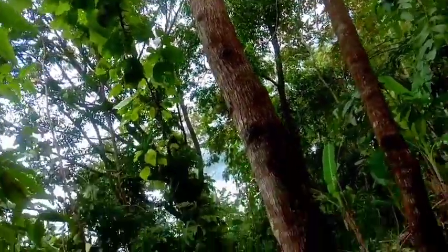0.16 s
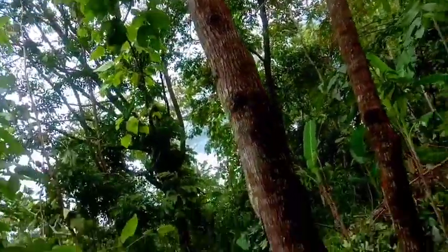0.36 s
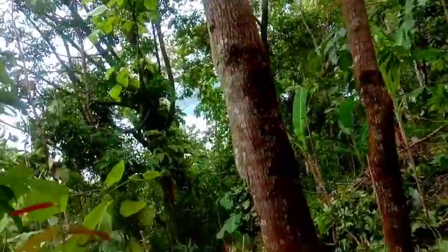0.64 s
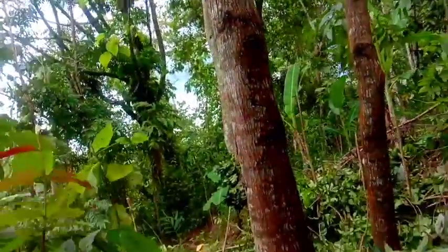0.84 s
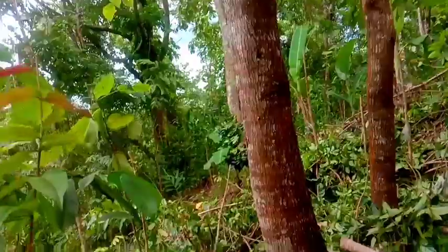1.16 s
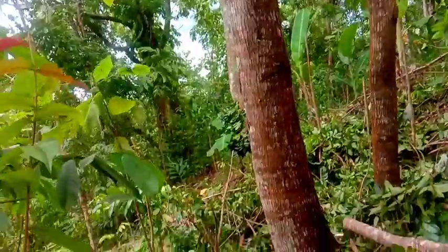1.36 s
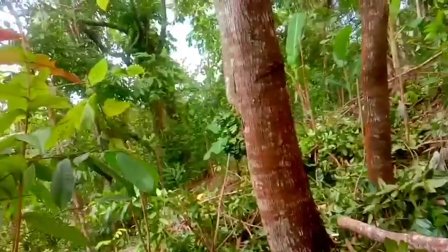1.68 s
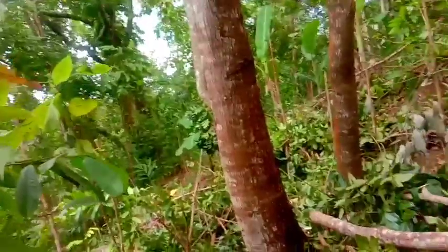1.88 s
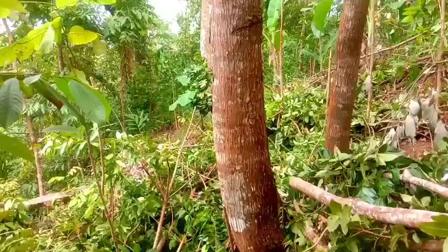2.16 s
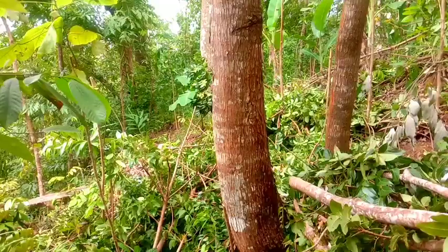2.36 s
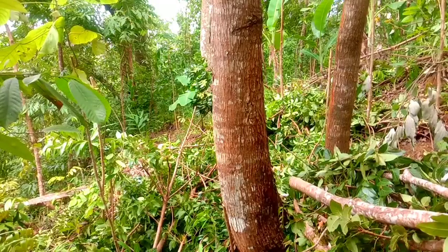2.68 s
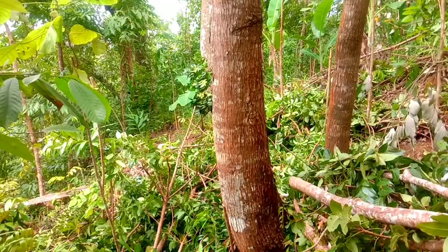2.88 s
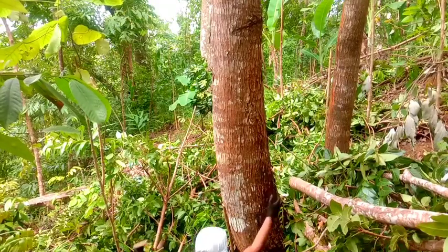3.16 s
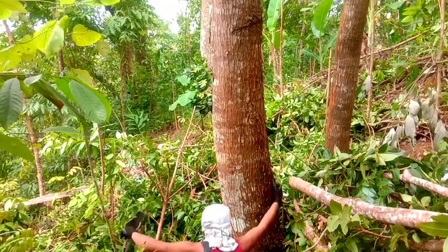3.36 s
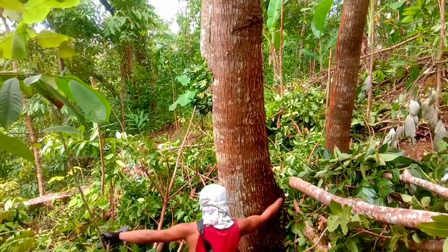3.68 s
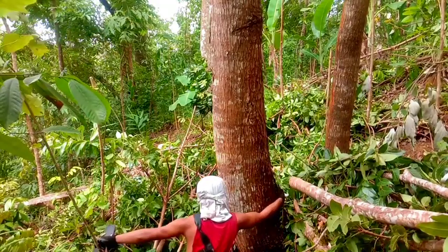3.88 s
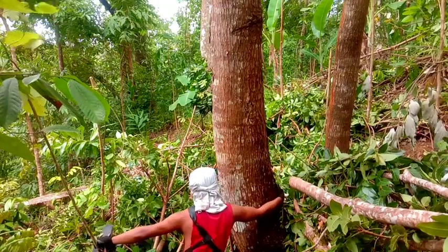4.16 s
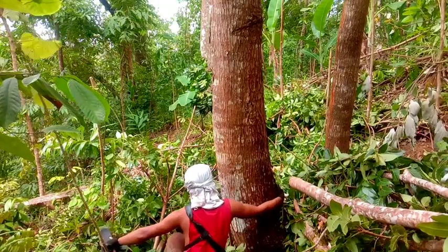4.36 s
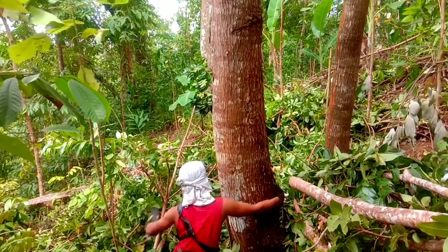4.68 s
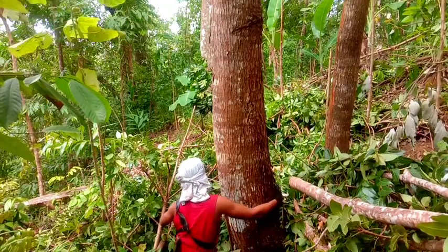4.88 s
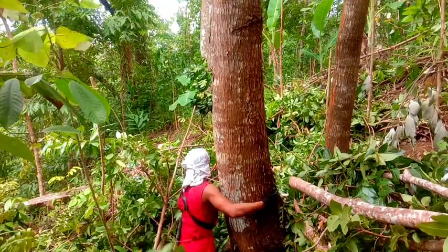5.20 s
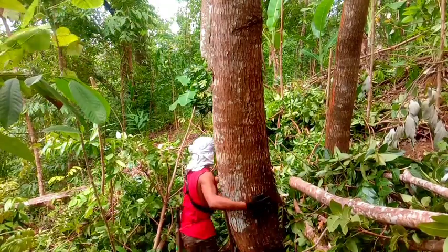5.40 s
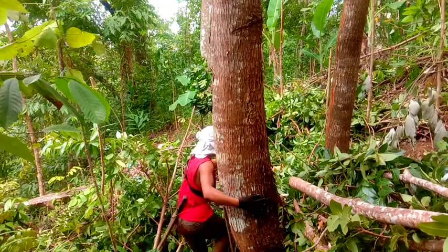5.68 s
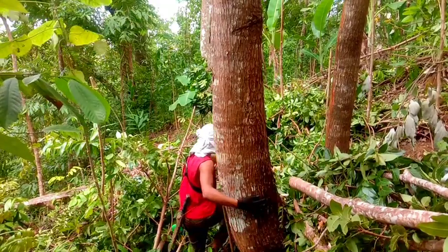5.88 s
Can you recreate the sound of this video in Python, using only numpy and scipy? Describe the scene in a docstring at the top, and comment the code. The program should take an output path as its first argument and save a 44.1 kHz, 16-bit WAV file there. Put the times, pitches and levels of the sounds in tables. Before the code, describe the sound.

For the first 2.3 seconds the forest is very quiet: a low soft murmur, faint hiss, slight leaf stirring and small dry ticks. At about 0.45-0.55 s a hand rubs the camera body, a short low fluttering shudder. A light woody knock comes at 0.76 s with little snaps until 1.1 s, then near calm. From 2.4 s heavy treads push through cut leafy brush in irregular close pulses, crunching and crackling, with soft ground thuds, stick knocks and twig snaps around 2.75, 3.1 and 3.3 s. A hard woody crack at 4.33 s begins the loudest stretch; bright sharp snaps follow at 4.85, 4.93 and 5.11 s, the last strongest. Crunching eases after 5.5 s, almost falling quiet, until a final hard crack and stick knock at 5.97 s. Close, dry, nearly mono, midrange-bright with a slightly boxy small-microphone colour.

```python
"""A foot stirs cut brush in a forest, close to a small camera: faint snaps and knocks over a low murmur.
Near 0.5 s a hand rubs the camera body: a train of slip pulses shakes two low resonances.
From about 2.4 s the treads grow heavy: noise in patches, crackle and ringing flecks make the leaves crush,
noise bursts snap as twigs with short tails, and decaying sines with drifting phase knock as sticks.
The loudest snaps come after 4.3 s; one tone colour shapes leaves and snaps, and a faint hiss adds width."""
import sys
import numpy as np
from scipy import signal
from scipy.fft import rfft, irfft, next_fast_len
from scipy.io import wavfile
from scipy.ndimage import uniform_filter1d, map_coordinates

SR = 44100
rng = np.random.default_rng(int(sys.argv[2]) if len(sys.argv) > 2 else 0)


def store_wav(level_fs):
    """Save 16-bit WAV to argv[1]."""
    pcm = np.round(np.clip(np.atleast_2d(level_fs), -1, 1) * 32767)
    wavfile.write(sys.argv[1], SR, pcm.T.astype(np.int16))


N = 266408


def amp(db):
    """Gain of a level in dB."""
    return 10 ** (np.asarray(db) / 20)


def unit(x):
    """x at rms 1."""
    return x / np.sqrt(np.mean(x ** 2) + 1e-20)


def along(points, hz):
    """Value at hz between (f/Hz, value) points, on a log frequency axis."""
    f, v = np.transpose(points)
    return np.interp(np.log(hz + 1), np.log(f + 1), v)


def curves(rows):
    """One value per sample for each column after the time."""
    s, *cols = np.transpose(rows)
    return [np.interp(np.arange(N) / SR, s, c) for c in cols]


def wobble(rate):
    """A smooth random curve with rate knots a second."""
    knots = rng.standard_normal(int(N * rate / SR) + 4)
    return map_coordinates(knots, [np.arange(N) * rate / SR])


def filtered(x, response):
    """x with its spectrum multiplied by a response of frequency."""
    m = next_fast_len(x.shape[-1] + 8192)
    spectrum = rfft(x, m) * response(np.fft.rfftfreq(m, 1 / SR))
    return irfft(spectrum, m)[..., :x.shape[-1]]


def resonance(f, centre, width):
    """A bandpass resonance with gain 1 at its centre; all arguments in Hz."""
    return 1j * f * width / (centre * centre - f * f + 1j * f * width + 1e-9)


def tone_db(hz):
    """Overall tone colour in dB: a broad curve falling steeply above 15.6 kHz, narrow peaks and a dip."""
    # broad colour: f/Hz, level/dB
    broad = [(40, -56), (150, -10.5), (370, -5), (1000, -5.5), (1700, -4.5), (4000, -4), (6000, -1.5),
             (7400, -4.5), (8700, -15), (12700, -26), (14200, -26.5), (15000, -9.5), (15550, -15.5),
             (15680, -37), (16700, -55.5)]
    # peaks and dip of the microphone's cavity: centre f/Hz, width/Hz, level/dB
    cavity = [(1246, 112, 10.5), (6640, 160, -14.5), (6930, 1600, 5)]
    return along(broad, hz) + sum(db / (1 + (2 * (hz - c) / w) ** 2) for c, w, db in cavity)


def coloured(x):
    """x with the tone colour as minimum phase: it rings after each sound, never before."""
    size = 8192
    response = amp(tone_db(np.fft.rfftfreq(size, 1 / SR)))
    cepstrum = irfft(np.log(response + 1e-4))
    # folding the cepstrum onto positive time gives minimum phase
    cepstrum[1:size // 2] *= 2
    cepstrum[size // 2 + 1:] = 0
    impulse = irfft(np.exp(rfft(cepstrum)))
    return signal.fftconvolve(x, impulse)[:N]


def thirds(x):
    """Low, middle and bright part of x, scaled so that coloured white noise has 0 dB in each band."""
    bands_hz = (200, 900), (1500, 8000), (9000, 14000)
    low = lambda hz: 1 / (1 + (hz / 1000) ** 4)
    high = lambda hz: 1 / (1 + (8300 / (hz + 1)) ** 12)
    middle = lambda hz: 1 - low(hz) - high(hz)
    powers = [np.sum(amp(2 * tone_db(np.arange(*band)))) * 2 / SR for band in bands_hz]
    return [filtered(x, share) / np.sqrt(power) for share, power in zip((low, middle, high), powers)]


def treads():
    """Gain of stems, crush, crisp edge and thud: each tread swells, holds and settles over the forest at rest."""
    # forest at rest: level/dB of stems, leaves, crisp edge, low murmur
    still_db = [-76.5, -69.5, -87.5, -77]
    # pushes of a foot: start t/s, hold/s, crush level/dB, thick stems/dB re crush,
    # dry crisp edge/dB re crush, ground thud level/dB
    pushes = [(0.1, 0.36, -72, -13, -24, -84), (0.852, 0.17, -71, -6, -27, -81),
              (1.425, 0.05, -71, -7, -19, -81), (1.897, 0.29, -69, -14, -25, -78),
              (2.365, 0.048, -53, -10.5, -20, -72), (2.494, 0.064, -54, -6, -20, -82),
              (2.63, 0.13, -44.5, -9.5, -21, -72), (2.867, 0.12, -50, -9.5, -19.5, -77),
              (3.11, 0.11, -53.5, -10.5, -22.5, -77), (3.274, 0.13, -48.5, -9, -22.5, -71.5),
              (3.502, 0.11, -49, -12.5, -20, -73), (3.703, 0.071, -50.5, -14.5, -19, -85),
              (3.818, .05, -57, -13, -17, -79), (3.923, 0.18, -48, -14, -19, -71),
              (4.153, .05, -55.5, -13, -19, -74), (4.273, 0.19, -48, -13, -20, -70.5),
              (4.575, 0.086, -47, -15, -15, -72), (4.72, 0.031, -43, -15, -19.5, -71),
              (4.86, .04, -57, -4, -24, -70), (4.927, 0.024, -43, -10.5, -19, -63.5),
              (5.173, 0.11, -50, -15.5, -17.5, -94), (5.302, 0.15, -48.5, -14.5, -20.5, -80),
              (5.55, 0.026, -60, -9.5, -19, -76), (5.726, 0.048, -53.5, -14.5, -22.5, -76),
              (5.954, 0.037, -68, -6.5, -12, -86)]
    rise_db_per_s, fall_db_per_s = 216, 86
    t = np.arange(N) / SR
    power = amp(still_db)[:, None] ** 2
    for s, hold, db, stems_db, crisp_db, thud_db in pushes:
        before, after = np.maximum(s - t, 0), np.maximum(t - s - hold, 0)
        shape_db = -rise_db_per_s * before - fall_db_per_s * after
        levels = amp([db + stems_db, db, db + crisp_db, thud_db])
        power = power + np.outer(levels, amp(shape_db)) ** 2
    return np.sqrt(power)


def side_hiss():
    """A faint wavering noise hiss, for opposite polarity in the two channels."""
    # hiss spectrum: f/Hz, relative density/dB per Hz
    spectrum = [(18, -41.5), (30, -20), (137, 0), (1030, -6), (1230, -1), (1830, -16), (5770, -21.5),
                (7120, -41), (15600, -17.5)]
    hiss = unit(filtered(rng.standard_normal(N), lambda hz: amp(along(spectrum, hz))))
    return amp(-83.5 + 6.3 * wobble(12)) * hiss


def air():
    """Footfalls and air: low-passed noise murmurs and swells with each tread."""
    # murmur spectrum: f/Hz, relative density/dB per Hz
    spectrum = [(15, -37), (40, -22.5), (70, -8), (140, -2.5), (250, -8.5), (500, -47)]
    murmur = unit(filtered(rng.standard_normal(N), lambda hz: amp(along(spectrum, hz))))
    thud_gain = treads()[-1]
    return thud_gain * amp(0.64 * wobble(9.2)) * murmur


def rub():
    """Skin slips on the camera housing at an uneven quick rate and shakes its low resonances."""
    # stroke of the hand: t/s, gain/dB
    stroke = [(.428, -99), (.441, -50.5), (.471, -50), (.5, -50.5), (.51, -66), (.521, -51), (.545, -74),
              (.58, -83.5)]
    # camera body resonances: f/Hz, width/Hz, level/dB
    body = [(136, 20, 6.5), (249, 26, -0.5)]
    level_db, = curves([(.4, -120)] + list(stroke) + [(.62, -120)])
    slips_per_s = 135 * (1 + .13 * wobble(60))
    pulses = np.diff(np.floor(np.cumsum(slips_per_s) / SR), prepend=0)
    slips = pulses * amp(3 * wobble(90))
    ring = lambda f: sum(amp(db) * resonance(f, c, w) for c, w, db in body)
    steep = lambda f: ring(f) * (f > 60) / (1 + (f / 400) ** 8)
    return amp(level_db) * unit(filtered(slips, steep))


def knocks():
    """A trodden stick rings briefly on one note, roughened where it scuffs; each ring is high-passed just below
    its note."""
    # ringing sticks and stems: t/s, level before onset and filter/dB, f/Hz, t60/s
    sticks = [(.216, -54.5, 2523, 0.13), (.221, -58.5, 5260, 0.15), (0.512, -49, 234, 0.044),
              (0.76, -39, 1266, 0.034), (.9, -62.5, 1150, 0.66), (1.013, -47, 1266, 0.035),
              (1.247, -55.5, 563, .1), (1.324, -57.5, 1750, .13), (1.349, -53, 1250, 0.097),
              (1.44, -60.5, 800, .13), (1.87, -55, 610, 0.063), (1.89, -56.5, 955, 0.09),
              (2.045, -56, 1755, .075), (2.109, -62.5, 1546, 0.21), (2.174, -51.5, 341, 0.098),
              (2.177, -46, 1310, 0.048), (2.181, -52, 131.8, 0.2), (2.421, -32.5, 542, 0.04),
              (3.082, -35, 583, 0.041), (3.179, -35, 671, 0.043), (3.43, -43.5, 520, 0.04),
              (4.161, -36.5, 631, 0.065), (4.326, -29, 698, 0.037), (4.332, -22.5, 1430, 0.038),
              (4.694, -47, 674, .044), (4.855, -46, 270, 0.18), (5.113, -29, 980, 0.038),
              (5.894, -56, 415, 0.087), (5.896, -46, 6140, .051), (5.968, -30, 434, 0.048),
              (5.968, -23, 948, 0.03), (5.968, -14.5, 2304, 0.021)]
    scuff_hz = 67  # how widely scuffing smears the note
    out, t = np.zeros(N + SR), np.arange(SR // 4) / SR
    for s, db, hz, t60 in sticks:
        # the phase walks at random
        drift = np.cumsum(np.sqrt(2 * np.pi * scuff_hz / SR) * rng.standard_normal(len(t)))
        envelope = amp(db - 60 * t / t60) * (1 - np.exp(-t / 0.0021))
        ring = envelope * np.sin(2 * np.pi * hz * t + drift)
        knock = filtered(ring, lambda f: 1 / (1 + (0.58 * hz / (f + 1)) ** 6))
        out[round(s * SR):][:len(t)] += knock
    return out[:N]


def snaps():
    """Each twig tears in fast cracks around its own pitch, and the forest floor scatters a short tail."""
    # twigs: t/s, peak level after the tone colour/dB, low part gain/dB, bright part gain/dB,
    # t60 of the cracks/s, pitch f/Hz, share of that pitch (0-1)
    twigs = [(0.3094, -56, -13, -6.5, 0.05, 7390, .27), (0.441, -48, -25, -18, 0.087, 7430, .43),
             (0.5441, -51, -23, -12, 0.047, 5990, 0.2), (0.748, -45.5, -18.5, -13, 0.076, 2370, 0.1),
             (0.7605, -40, -12, -31, 0.029, 7200, .05), (0.853, -47, -32, -11, 0.17, 6000, .6),
             (0.8835, -43, -30, -9, 0.074, 6100, .82), (0.9283, -49.5, -10, -7, 0.058, 7100, .5),
             (0.9428, -43.5, -25, -12, 0.061, 7560, 0.23), (1.012, -44, -8, -13, 0.028, 5170, 0),
             (1.0773, -54, -24, -9, 0.05, 5860, .2), (1.3493, -53.5, -17, -9, 0.064, 7240, .8),
             (2.174, -50, -4, -39, 0.025, 1520, .71), (2.1984, -49, -22, -26, 0.075, 6250, .05),
             (2.4208, -32, -17, -45, 0.046, 1860, .53), (2.5253, -37, -5, -34.5, 0.06, 2220, 0.56),
             (2.7473, -27.5, -4.5, -7, 0.044, 7120, 0.02), (2.928, -32, -25, -15, 0.021, 7540, 0.14),
             (3.08, -31, -5, -19.5, 0.024, 1770, .33), (3.174, -36.5, -12, -26.5, 0.096, 3380, 0.17),
             (3.246, -36.5, 0.5, -29, 0.039, 2480, .7), (3.312, -28.5, -9, -15, 0.063, 5600, .05),
             (3.5096, -45, -8, -13, 0.078, 6380, .4), (3.864, -39.5, -30, -27, 0.05, 6930, 0.8),
             (3.9449, -30.5, -7, -17, 0.24, 5960, 0.13), (4.2045, -30.5, -10, -17, 0.084, 3720, 0.4),
             (4.3278, -16.5, -16, -25.5, 0.061, 1540, 0.18), (4.4401, -34.5, -32, -23, 0.081, 4700, .35),
             (4.5045, -31.5, -11.5, -22, 0.16, 3360, .61), (4.5773, -32, -11, -12, 0.39, 6200, 0.28),
             (4.692, -29, -6, -42, 0.049, 1490, .65), (4.727, -33.5, -16, -13, 0.25, 4930, .1),
             (4.8503, -15, -15, -8, 0.031, 4760, 0.2), (4.9307, -17, -44.5, -7.5, 0.028, 4800, 0.36),
             (4.9801, -27, -28, -12, 0.22, 6000, .1), (5.112, -11, -18, -8, 0.027, 4770, 0.23),
             (5.4395, -33.5, -20, -13.5, 0.14, 6600, .13), (5.729, -39, -9, -21, 0.084, 5630, 0.3),
             (5.967, -13.5, -14.5, -19, 0.052, 2450, 0.11)]
    out, t = np.zeros(N + SR), np.arange(SR // 4) / SR
    for s, db, low_db, bright_db, t60, hz, focus in twigs:
        # fibres give way one by one: a new random level every 40 samples
        cracks = amp(3.14 * np.repeat(rng.standard_normal(len(t)), 40)[:len(t)])
        tail = amp(-4.0 - 60 * t / 0.18)
        shape = (cracks * amp(-60 * t / t60) + tail) * (1 - np.exp(-t / 0.00046))
        low, mid, bright = thirds(shape * rng.standard_normal(len(t)))
        modes_hz = 900 * 8 ** rng.random(size=6)  # the broken ends ring at scattered pitches
        pitch = lambda f: 1 - focus + 3 * focus * resonance(f, hz, hz / 2.8)
        ends = lambda f: 1 + 0.64 * sum(resonance(f, c, c / 6.6) for c in modes_hz)
        wood = filtered(mid, lambda f: pitch(f) * ends(f))
        snap = amp(low_db) * low + wood + amp(bright_db) * bright
        out[round(s * SR):][:len(t)] += amp(db) * snap / np.abs(coloured(snap)).max()
    return out[:N]


def crackle(per_second, spread_db, life):
    """Tiny fractures at random moments, each a noise puff of its own size that decays over life seconds."""
    hits = (rng.random(N) < per_second / SR) * amp(spread_db * rng.standard_normal(N))
    decay = np.exp(-1 / (max(life, 1e-4) * SR))
    puffs = signal.lfilter([1], [1, -decay], hits)
    return unit(puffs * rng.standard_normal(N))


def flecks(centre_hz, octaves, cycles, spread_db, count):
    """Single stiff leaves flex and ring briefly, each at its own pitch; low ones are faint."""
    draw, t = rng.standard_normal((count, 2)), np.arange(1000) / SR
    hz = np.clip(centre_hz * 2 ** (octaves * draw[:, :1]), 150, 14000)
    age = t * np.sqrt(hz * centre_hz) / cycles
    size = amp(spread_db * draw[:, 1:]) * hz ** 0.77
    rings = size * age * np.exp(-age) * np.sin(2 * np.pi * hz * t)
    at = rng.integers(0, N, (count, 1)) + np.arange(len(t))
    return unit(np.bincount(at.ravel(), rings.ravel())[:N])


def leaves():
    """Countless leaves hiss together in patches; the nearest crackle and ring singly."""
    z = signal.stft(rng.standard_normal(N), nperseg=512)[2]
    # smoothed random gains over frequency and time make the patches
    field = uniform_filter1d(rng.standard_normal(z.shape), size=3, axis=0)
    field = uniform_filter1d(field, size=6, axis=1)
    hiss = unit(signal.istft(z * amp(2.88 * unit(field)), nperseg=512)[1][:N])
    fractures = crackle(300, spread_db=7.5, life=0.0052)
    single_leaves = flecks(3495, octaves=.9, cycles=25.0, spread_db=0, count=2500)
    crush = unit(hiss + 0.3 * fractures + 0.16 * single_leaves)
    crush = crush * amp(0.82 * wobble(30) + 0.16 * wobble(10))
    # stems, crush and crisp edge drive the three parts; zip leaves the thud out
    return sum(gain * part for gain, part in zip(treads(), thirds(crush)))


def scene():
    """Both channels carry the same scene; only a faint wavering hiss sets them apart."""
    shared = coloured(leaves() + snaps()) + knocks() + rub() + air()
    apart = side_hiss()
    return np.array([shared + apart, shared - apart])


def record(dry):
    """The sound holds nothing above top_hz and sits slightly off zero."""
    top_hz, offset = 16800, -.000126  # offset re full scale
    return filtered(dry, lambda hz: hz < top_hz) + offset


dry = scene()
out = record(dry)
store_wav(out)
```